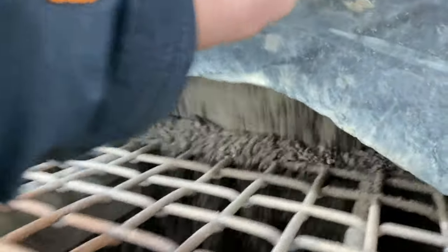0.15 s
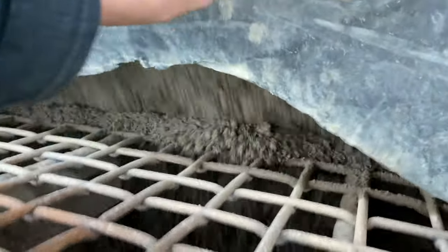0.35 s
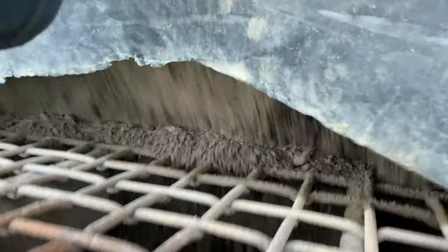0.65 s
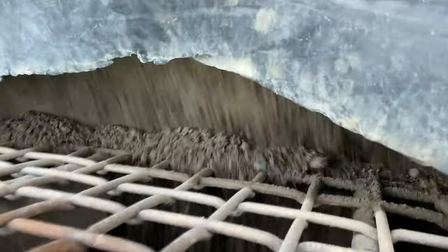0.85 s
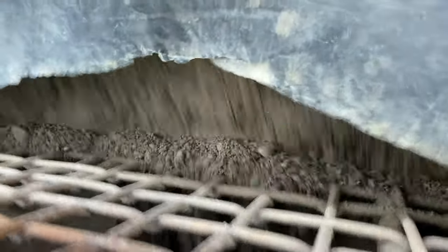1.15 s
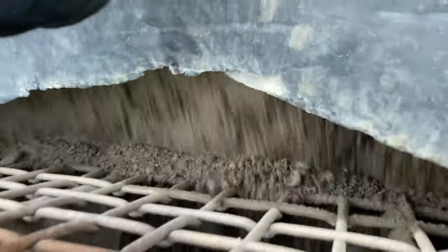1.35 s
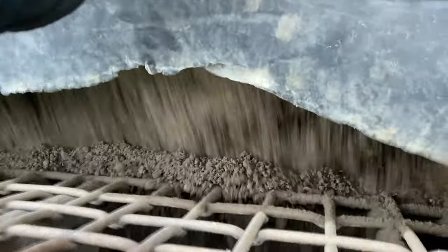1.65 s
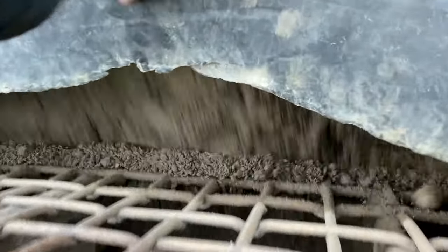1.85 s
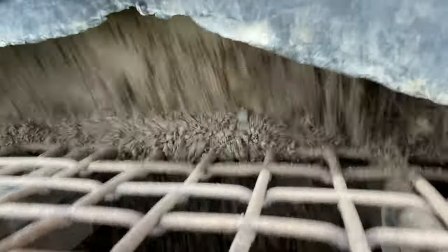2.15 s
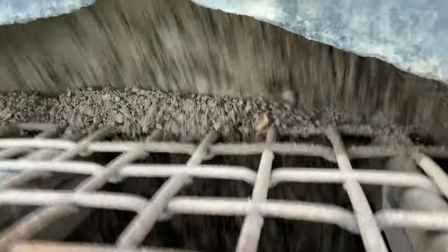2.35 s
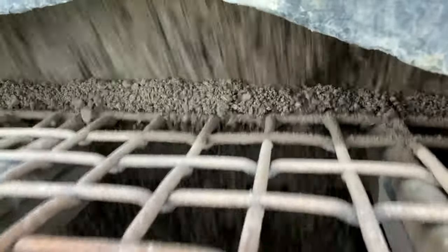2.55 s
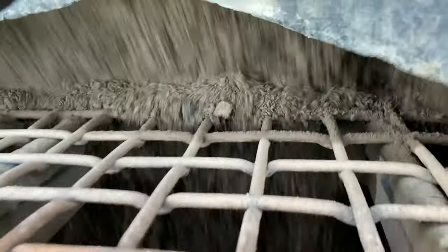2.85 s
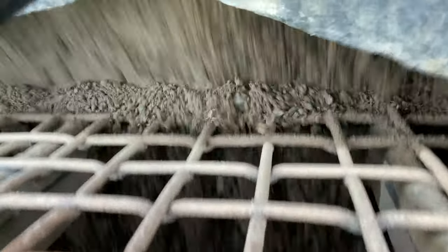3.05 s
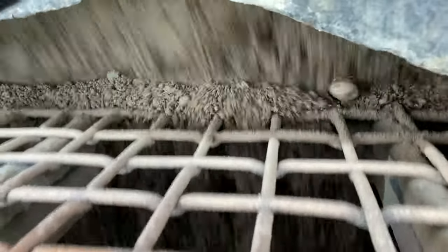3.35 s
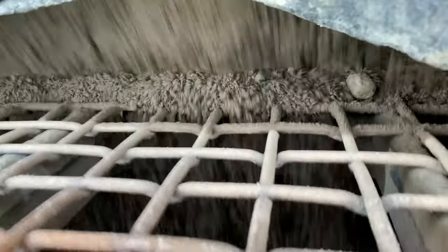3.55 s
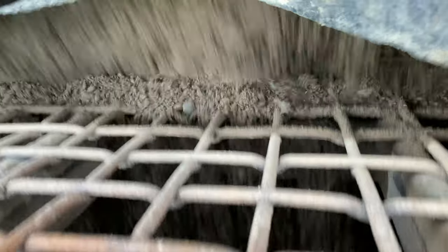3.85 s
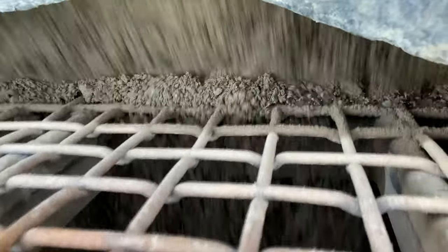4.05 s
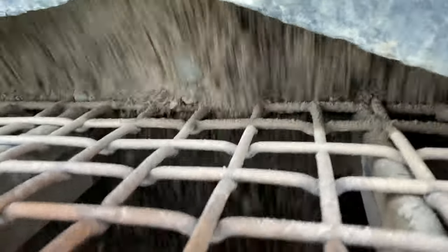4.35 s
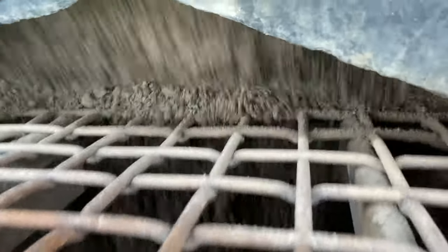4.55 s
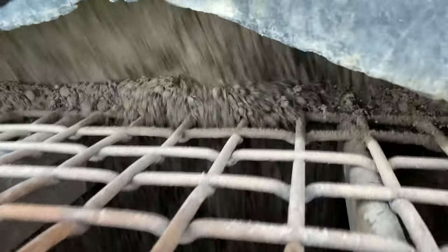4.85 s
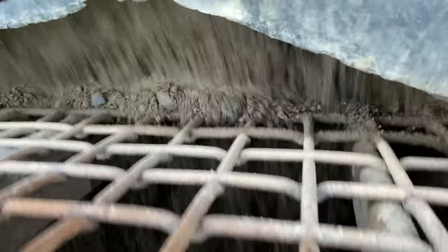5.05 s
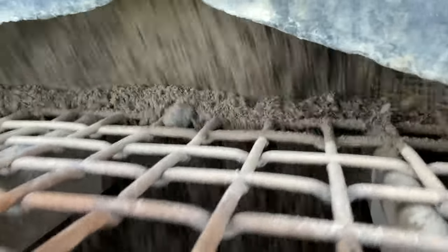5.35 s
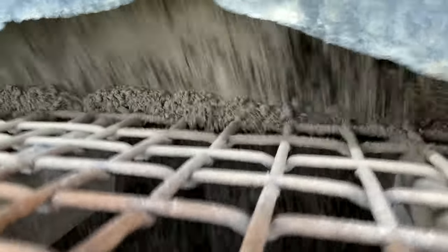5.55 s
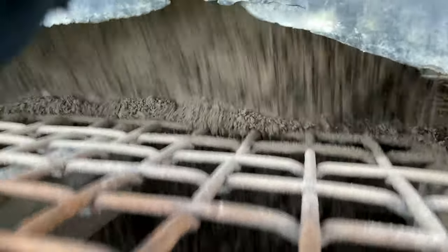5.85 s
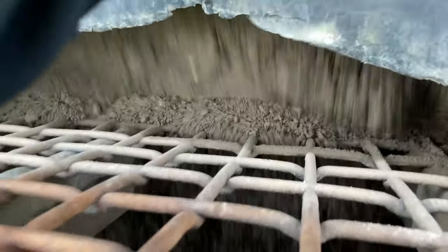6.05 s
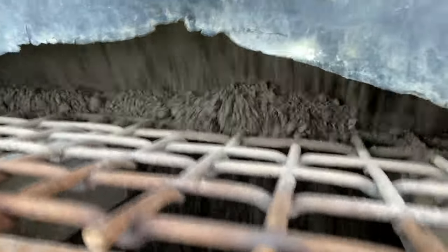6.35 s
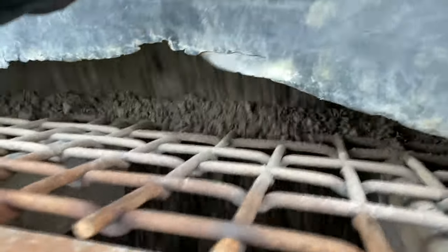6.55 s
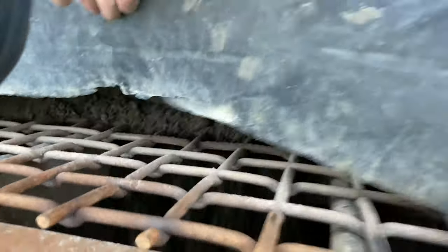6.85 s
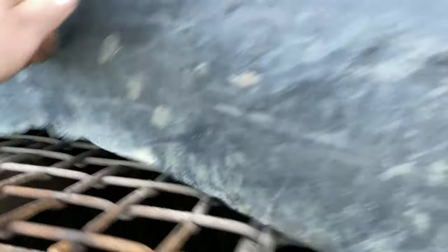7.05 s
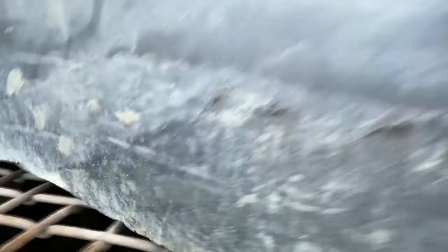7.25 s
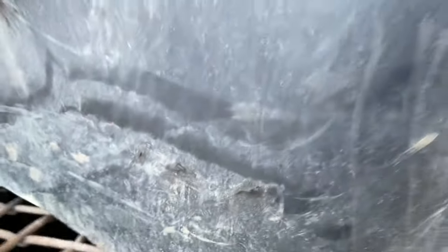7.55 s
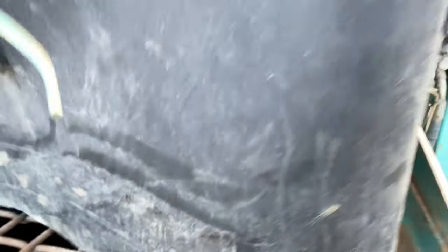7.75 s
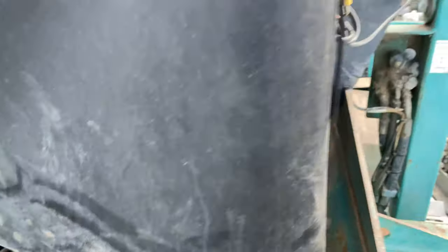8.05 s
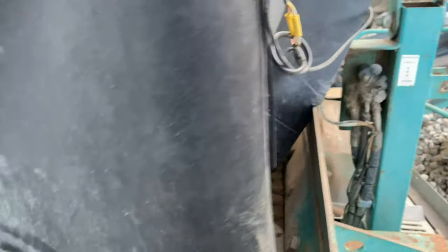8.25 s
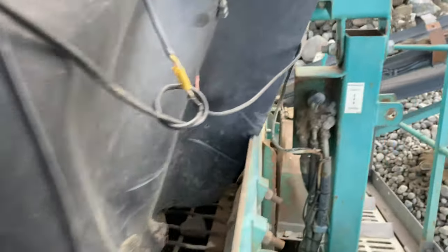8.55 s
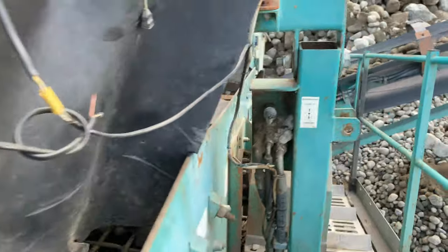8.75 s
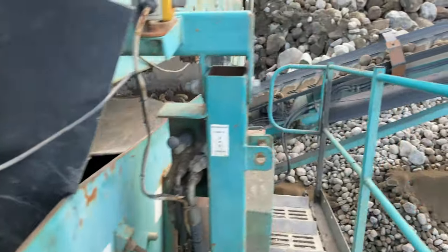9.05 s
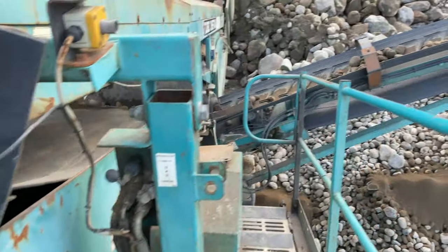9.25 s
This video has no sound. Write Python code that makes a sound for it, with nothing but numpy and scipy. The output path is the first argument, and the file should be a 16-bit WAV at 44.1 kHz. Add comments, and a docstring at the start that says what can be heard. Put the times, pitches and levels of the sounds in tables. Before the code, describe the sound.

From 0 to about 7 seconds the microphone sits very close to a vibrating screen outdoors. Sand makes a dense, grainy hiss, surging about nineteen times a second, mixed with pattering pebbles and irregular small clinks. Underneath, a hopper rumbles with short soft booms, most frequent in the first two seconds, and a diesel engine hums low and steady among wavering drones. Clumps of coarse stones rattle briefly, notably near 0.8 and 2.1 seconds. Hard stones clack and ping on the wires at about 3.6 and 4.8, the pings mainly on the left; sharp chips tick throughout. The rumble and drones slowly recede. Around 7 to 8 seconds the flap drops and the microphone pulls back, with stones clumping near 8.1. Until the cut at roughly 9.4 the gravel continues, its fine hiss duller and pulsing deeper, with coarse clatter more evident and the engine weaker.

```python
"""Gravel on a screening deck

A two-port microphone close to the vibrating steel mesh of a diesel screening plant, at a lifted rubber flap.
The deck throws its load about 19 times a second: sand hisses as dense random impulses, pebbles patter as
scraping grains in clumps, and single stones clack, knock and ping as noise bursts and damped modes.
Behind them the hopper rumbles and booms, and the engine hums in sine tones among wavering drones.
Rumble and drones recede steadily; late on the flap drops, the hiss dulls and the microphone is furthest back."""
import sys
import numpy as np
from scipy import signal
from scipy.fft import rfft, irfft, next_fast_len
from scipy.io import wavfile
from scipy.ndimage import map_coordinates

SR = 44100
rng = np.random.default_rng(int(sys.argv[2]) if len(sys.argv) > 2 else 0)


def digitize_waveform(pressure):
    """Quantize a signal to 16-bit integers and store it at the path in sys.argv[1].

    Rows of a 2-D input are taken as channels; values are limited to [-1, 1].
    """
    field = np.atleast_2d(pressure).T
    bounded = np.clip(field, -1, 1)
    quanta = np.round(bounded * 32767).astype(np.int16)
    wavfile.write(sys.argv[1], SR, quanta)


N = 414981
T = np.arange(N) / SR


def amp(db):
    """Decibels to gain."""
    return 10 ** (np.asarray(db) / 20)


def unit(x):
    """Scale to rms 1."""
    return x / np.sqrt(np.mean(x ** 2) + 1e-20)


def along(points, hz):
    """Read (frequency [Hz], value) points on a log frequency axis."""
    f, v = np.transpose(points)
    return np.interp(np.log(hz + 1), np.log(f + 1), v)


def curve(rows):
    """Draw (time [s], value) rows as one value per sample."""
    return np.interp(T, *np.transpose(rows))


def wobble(rate):
    """A smooth random curve with rate knots a second."""
    knots = rng.standard_normal(int(N * rate / SR) + 4)
    return map_coordinates(knots, [T * rate])


def filtered(x, response):
    """Multiply the spectrum of x by a complex response of frequency."""
    m = next_fast_len(N + SR // 2)
    hz = np.fft.rfftfreq(m, 1 / SR)
    return irfft(rfft(x, m) * response(hz), m)[..., :N]


def bells(peaks, hz):
    """Summed dB of bell-shaped resonances (positive) and hollows (negative)."""
    return sum(db / (1 + (2 * (hz - centre) / width) ** 2) for centre, width, db in peaks)


def colour(x, spectrum, peaks=()):
    """Give x a broad spectrum with resonances on it, at rms 1."""
    return unit(filtered(x, lambda hz: amp(along(spectrum, hz) + bells(peaks, hz))))


def impacts(rate, spread_db):
    """Two streams of random impulses, rate a second, with log-normal sizes; rms 1."""
    hit = rng.random((2, N)) < rate / SR
    size = amp(spread_db * np.clip(rng.standard_normal((2, N)), -3, 2.4))
    sign = rng.choice([-1, 1], (2, N))
    return unit(hit * size * sign)


def pebbles(rate, spread_db, t60):
    """Each pebble lands with a short scrape of noise and a faint ring at a pitch of its own."""
    t = np.arange(SR // 50) / SR
    when, pitch, size, life = rng.random((int(rate * N / SR), 4)).T[..., None]
    hz = 2000 + 11000 * pitch
    ring = .5 * np.sin(2 * np.pi * hz * t)  # the same at both ports
    scrape = rng.standard_normal((2, len(hz), len(t)))
    level_db = -spread_db * np.log(size + .02) - 60 * t / (t60 * (.5 + life))
    grains = (ring + scrape) * amp(level_db)
    index = (when * N).astype(int) + np.arange(len(t))
    return unit(np.array([np.bincount(index.ravel(), g.ravel(), N)[:N] for g in grains]))


def bursts(times, levels_db, spectrum, attack, t60):
    """Coloured noise that starts at each blow and dies quickly; attack and t60 in seconds."""
    envelope = np.zeros(N + SR)
    t = np.arange(SR // 5) / SR
    for s, db in zip(times, levels_db):
        envelope[round(s * SR):][:len(t)] += amp(db - 60 * t / t60) * (1 - np.exp(-t / attack))
    return envelope[:N] * colour(rng.standard_normal((2, N)), spectrum)


def ringing(blows, modes, attack):
    """Damped modes (multiple, dB, t60) set off by each (s, dB, pitch) blow."""
    out = np.zeros(N + SR)
    t = np.arange(SR // 5) / SR
    for s, db, pitch in blows:
        ring = 0
        for multiple, level, t60 in modes:
            tone = np.sin(2 * np.pi * (multiple * pitch * t + rng.random()))
            ring = ring + amp(level - 60 * t / t60) * tone
        out[round(s * SR):][:len(t)] += amp(db) * ring * (1 - np.exp(-t / attack))
    return out[:N]


def swells(rows, half_s, q, grain_db):
    """A short bell-shaped swell of grainy band noise centred on each (s, dB, centre Hz) row."""
    out = np.zeros((2, N + SR))
    t = np.arange(SR // 2) / SR
    hz = np.fft.rfftfreq(len(t), 1 / SR) + 1
    shape = np.exp(-((t - t.mean()) / half_s) ** 2)
    for s, db, centre in rows:
        grain_levels = grain_db * rng.standard_normal(len(t) // 50).repeat(50)  # a new level every 50 samples
        grains = rng.standard_normal((2, len(t))) * amp(grain_levels)
        resonance = 1 / (1 + 1j * q * (hz / centre - centre / hz))
        dulling = 1 / (1 + (hz / (3 * centre)) ** 2)
        band = irfft(rfft(grains) * resonance * dulling)
        out[:, round(s * SR):][:, :len(t)] += amp(db) * shape * unit(band)
    return out[:, SR // 4:][:, :N]  # puts the middle of each swell on its time


# engine firing hum: (time [s], mean level [dB])
HUM_LEVEL = [(0, -22), (5.1, -24), (5.8, -24.5), (7.4, -26), (9.4, -31)]


def engine():
    """The diesel's firing note with faint overtones, a little unsteady under load."""
    firing_hz = 73.82
    phase = 2 * np.pi * firing_hz * T + 0.04 * wobble(8.0)
    note = np.sin(phase) + amp(-18.5) * np.sin(2 * phase) + amp(-18) * np.sin(3 * phase)
    return unit(note) * amp(curve(HUM_LEVEL) + 0.29 * wobble(6.6))


FADE_DB_PER_S = 0.4561  # rumble and drones recede as the microphone moves off

# low drones of the machine: (frequency [Hz], mean peak level at the start [dB])
DRONE_TONES = [(92.4, -35), (124, -34.5), (169, -36), (203, -36.5), (224, -39.5)]


def drones():
    """Panels and drives of the machine drone, each swelling and wavering on its own."""
    swell_db, drift_rad = 2, 0.64
    tones = 0
    for hz, db in DRONE_TONES:
        level = amp(db + swell_db * wobble(3))
        tones = tones + level * np.sin(2 * np.pi * hz * T + drift_rad * wobble(1.95))
    return tones * amp(-FADE_DB_PER_S * T)


# broad colour of the hopper's rumble: (frequency [Hz], level [dB per Hz])
RUMBLE_SPECTRUM = [(25, -32), (36, -25), (52, -4.5), (90, -1), (160, -1), (230, 0), (310, -3), (400, -8.5),
                   (700, -24.5), (2000, -78)]
# resonances of the hopper's plates: (frequency [Hz], width [Hz], level [dB])
PLATE_RESONANCES = [(124, 7.4, 4), (224, 8.4, 2.5)]
# heavy clods slumping into the hopper: (time [s], level [dB], centre frequency [Hz])
CLOD_BOOMS = [(0.1, -24, 242), (0.63, -21.5, 124), (0.75, -17.5, 214), (0.82, -24, 126), (0.98, -20.5, 129),
              (1.29, -18, 215), (1.54, -22, 125), (1.72, -22, 279), (1.95, -16.5, 221), (2.5, -21, 218),
              (2.54, -29, 124), (3.23, -18.5, 216), (3.5, -22.5, 227), (5.88, -24, 123), (6.33, -23.5, 126),
              (7.43, -30, 221), (8.83, -24.5, 220), (8.94, -31, 325)]


def hopper():
    """Stones thud unevenly on the big steel plates; each heavy clod adds a short boom."""
    thuds = impacts(rate=1500, spread_db=2.5)
    level_db = -19.5 - FADE_DB_PER_S * T + 0.65 * wobble(8)
    rumble = colour(thuds, RUMBLE_SPECTRUM, PLATE_RESONANCES) * amp(level_db)
    return rumble + swells(CLOD_BOOMS, half_s=0.082, q=6.4, grain_db=-1.5)


# how far the microphone has drawn back: (time [s], distance [0-1])
MIC_RETREAT = [(0, 0.35), (6.7, 0.51), (7.3, 0.6), (8, 1)]


def throws():
    """The deck's stroke, highest as the load lands; throws vary, and the surge is deeper from further back."""
    throw_hz, landing = 18.775, .68  # landing as a share of the cycle
    fullness = 1 + .35 * wobble(9) + .35 * curve(MIC_RETREAT)
    return np.cos(2 * np.pi * (throw_hz * T - landing)) * fullness


# coarse stones at the open end of the deck: (time [s], level before the jolts [dB])
COARSE_LEVEL = [(0, -35), (8.1, -46), (8.33, -34.5), (9.4, -32)]
# colour of their rattle: (frequency [Hz], level [dB per Hz])
CLATTER_SPECTRUM = [(700, -14), (1500, 1.5), (2400, 3), (3300, -3), (5000, -8.5), (9000, -45)]


def clatter():
    """Stones too big for the mesh hop along the far end of the deck."""
    hops = pebbles(rate=450, spread_db=3.0, t60=0.071)
    jolts_db = 1.5 * throws() + .5 * wobble(14)
    return colour(hops, CLATTER_SPECTRUM) * amp(curve(COARSE_LEVEL) + jolts_db)


# clumps of coarse stones rattling down together: (time [s], level [dB], centre frequency [Hz])
STONE_CLUMPS = [(0.629, -23, 2280), (0.73, -24.5, 1900), (0.84, -20.5, 1200), (1.922, -21, 1720),
                (2.006, -22.5, 1670), (2.108, -20.5, 1700), (2.133, -16, 1360), (2.64, -23, 1200),
                (2.86, -24, 1900), (3.172, -23, 1400), (4.137, -21.5, 1200), (4.313, -23.5, 1600),
                (4.63, -22, 1200), (6.011, -23, 1890), (6.523, -23.5, 1200), (7.225, -20, 1300),
                (7.435, -24, 1480), (7.656, -22, 1110), (8.075, -18.5, 945), (8.355, -21, 1500),
                (8.4, -26, 1810), (8.584, -23, 1480), (9.11, -28, 2300), (9.385, -26.5, 2190)]


def clumps():
    """Coarse stones arrive in bunches, each a brief swell of grainy noise."""
    return swells(STONE_CLUMPS, half_s=0.019, q=1.2, grain_db=-1.5)


# the stream of gravel on the deck, also the reference for stray stones: (time [s], relative level [dB])
GRAVEL_FLOW = [(0.0, -26), (0.26, -24.5), (3.78, -27), (4.25, -26), (4.61, -26.5), (5.93, -26.5),
               (7.92, -28.5), (8.5, -26.5), (8.91, -28.5), (9.3, -27.5)]


def flow_at(s):
    """Relative level of the gravel stream in dB at the times s."""
    return np.interp(s, *np.transpose(GRAVEL_FLOW))


def stray_pebbles():
    """Rows (s, dB, pitch Hz) of single pebbles that clink on the mesh at random."""
    per_s, above_flow_db, lowest_hz, octaves = 22, 2.8, 1000, 2.3
    place, size, pitch = rng.random((int(per_s * N / SR), 3)).T
    s = place * N / SR
    level_db = flow_at(s) + above_flow_db + 3 * (size - pitch)  # high clinks are weaker
    return np.c_[s, level_db, lowest_hz * 2 ** (octaves * pitch)]


# modes of a clinking pebble: (multiple of its pitch, level [dB], t60 [s])
PEBBLE_MODES = [(1, 0, .045), (1.6, -7, .03)]


def clinks():
    """Single pebbles ring on the mesh, at both ports together but in unrelated phase."""
    landings = stray_pebbles()
    return np.array([ringing(landings, PEBBLE_MODES, attack=.002) for _ in range(2)])


def stray_chips():
    """Rows (s, dB) of small chips, one at a random moment in each stretch, levelled from the flow."""
    per_s, above_flow_db, scatter_db = 1.5, -8, 6
    place, size = rng.random((int(per_s * N / SR), 2)).T
    s = (np.arange(len(place)) + place) / per_s
    return np.c_[s, flow_at(s) + above_flow_db + scatter_db * (2 * size - 1)]


# heavy stones on the wires: (time [s], wire ring level [dB], wire pitch [Hz], knock level [dB])
HEAVY_STONES = [(0.630, -22, 3400, -23), (2.129, -26, 4300, -18), (3.601, -20, 4300, -13),
                (3.603, -13, 4300, -23), (3.608, -16, 3850, -22), (4.820, -24, 4050, -18),
                (4.836, -11, 4030, -22), (4.843, -17, 4150, -20)]
# modes of a struck wire: (multiple of its pitch, level [dB], t60 [s])
WIRE_MODES = [(.87, -11, .03), (1, 0, .036), (1.06, -11, .03), (1.38, -13, .03)]


def wires():
    """The wire that a big stone hits pings briefly, close to the left port; the right is shaded."""
    blows = [row[:3] for row in HEAVY_STONES]
    ping = ringing(blows, WIRE_MODES, attack=.001)
    right_gain = amp(-13)
    return ping * np.array([[1], [right_gain]])


# the sharpest chips flicking against steel: (time [s], level [dB])
SHARP_CHIPS = [(0.624, -29), (1.092, -27), (2.109, -22), (2.357, -23), (3.32, -29), (3.599, -18.5),
               (4.115, -26), (4.604, -28), (4.814, -25), (6.521, -24), (6.659, -28), (7.172, -32),
               (8.658, -25)]
# colours of a stone's crunch, its knock and a chip's tick: (frequency [Hz], level [dB per Hz])
CRUNCH_SPECTRUM = [(1500, -22), (3100, -12), (3600, -2), (4400, 0), (5000, -8), (5800, -9), (7000, -19),
                   (12000, -36)]
KNOCK_SPECTRUM = [(200, -12), (650, 0), (1200, 0), (2000, -1), (2900, -6), (4500, -15), (7000, -25),
                  (14000, -42)]
TICK_SPECTRUM = [(2000, -14), (6000, -4), (8200, -1), (11000, 0), (16000, -8)]
# modes of the frame under the mesh: (frequency [Hz], level [dB], t60 [s])
FRAME_MODES = [(428, 2, 0.17), (715, -5, 0.086), (1126, -15, .06), (1390, -3, 0.082), (1545, -10, .07),
               (1830, -15, 0.041)]


def stones():
    """Big stones crunch on the mesh and knock the frame into ringing; chips only tick."""
    crunch_db, frame_db = -5.5, -5  # against the wire's ring; against the knock
    s, ring_db, _, knock_db = np.transpose(HEAVY_STONES)
    crunch = bursts(s, ring_db + crunch_db, CRUNCH_SPECTRUM, attack=.001, t60=.045)
    knock = bursts(s, knock_db, KNOCK_SPECTRUM, attack=.0005, t60=.055)
    blows = np.c_[s, knock_db + frame_db, np.ones(len(s))]  # the frame keeps its pitch
    frame = np.array([ringing(blows, FRAME_MODES, attack=.0005) for _ in range(2)])
    chip_s, chip_db = np.transpose(np.vstack([SHARP_CHIPS, stray_chips()]))
    ticks = bursts(chip_s, chip_db, TICK_SPECTRUM, attack=.0007, t60=.045)
    return crunch + knock + frame + ticks


# finest spray, shut in once the flap has dropped: (time [s], treble gain [dB])
SPRAY_TREBLE = [(7.0, 0.13), (8.65, -2.5)]
# broad colour of sand on mesh: (frequency [Hz], level [dB per Hz])
SAND_SPECTRUM = [(150, -25), (350, -3.5), (600, 1), (900, 1), (1600, -1), (2300, -6.7), (3200, -9.7),
                 (4400, -12.7), (6000, -19), (7500, -23.5), (8800, -25), (10200, -23.5), (12000, -25.3),
                 (14000, -28.5), (15600, -34)]
# resonances and hollows of the screen box and its wires: (frequency [Hz], width [Hz], level [dB])
BOX_RESONANCES = [(444, 235, 5), (862, 69, 2), (1428, 58, 3.5), (5060, 240, 3.5), (5580, 210, -5.5),
                  (5960, 160, -1), (5680, 100, 8.5)]


def gravel():
    """Sand and pebbles land on the mesh in a surge at every throw of the deck."""
    surge = throws()
    sand = impacts(rate=12000, spread_db=2.5)
    patter = pebbles(rate=450, spread_db=2.8, t60=.018)
    stream = colour(sand + amp(-3.5) * patter, SAND_SPECTRUM, BOX_RESONANCES)
    # fine grains, the treble, swell and sink more deeply than coarse ones, and the flap shuts them in
    fine = filtered(stream, lambda hz: 1 / (1 + (3300 / (hz + 1)) ** 4))
    coarse = stream - fine
    coarse_swing_db = .9 * surge + .45 * wobble(20)
    fine_swing_db = 1.25 * surge + .95 * wobble(14)
    uneven_db = .4 * wobble(12) + .35 * wobble(30)
    grains = coarse * amp(coarse_swing_db) + fine * amp(fine_swing_db + curve(SPRAY_TREBLE))
    return grains * amp(curve(GRAVEL_FLOW) + 5.5 + uneven_db)  # 5.5 dB lifts the stream over the flow


def walls(x, share, count):
    """Faint early echoes from the steel sides put a fine ripple on the upper spectrum."""
    delays = rng.uniform(.002, .025, (2, count))  # seconds
    signs = rng.choice([-1, 1], (2, count))
    echoes = np.zeros((2, SR // 32))
    np.put_along_axis(echoes, (delays * SR).astype(int), signs / np.sqrt(count), axis=1)
    bright = filtered(x, lambda hz: hz / (hz + 900))
    return x + share * signal.fftconvolve(bright, echoes, axes=1)[:, :N]


# resonances and hollows that shift as the microphone moves past curtain and frame:
# (width [Hz], rows of (time [s], mean centre [Hz], mean level [dB]))
SHIFTING_RESONANCES = [(70, [(7.7, 230, 0), (8.2, 215, -3.5), (8.8, 170, -2), (9.4, 135, -2)]),
                       (100, [(2, 430, 0), (4.8, 390, 2), (8.3, 330, 0), (8.85, 330, 4), (9.4, 340, 0.5)]),
                       (100, [(7.2, 475, 0), (8.3, 470, -4.5), (9.4, 450, -6.5)]), (170, [(2.5, 880, 1),
                       (4.3, 830, 2), (5.8, 950, 2), (6.8, 950, 1.5), (7.3, 910, 4), (8.3, 900, 3),
                       (9.4, 850, -1.5)]), (220, [(7.4, 1250, 1.5), (7.9, 1230, -4), (8.5, 1210, -12),
                       (8.8, 1300, -1.5), (9.4, 1550, -4)])]


def shifting(x):
    """Colour x with the resonances and hollows that move with the microphone."""
    hz, s, z = signal.stft(x, SR, nperseg=2048)
    peaks = []
    for width, rows in SHIFTING_RESONANCES:
        when, centre, db = np.transpose(rows)
        waver = 1 + 0.045 * np.interp(s, T, wobble(4.6))
        flutter_db = 0.94 * np.interp(s, T, wobble(7))
        peaks.append((np.interp(s, when, centre) * waver, width, np.interp(s, when, db) + flutter_db))
    return signal.istft(z * amp(bells(peaks, hz[:, None])), SR)[1][:, :N]


def ports(pair, table):
    """Mix two unrelated signals into left and right; left leads, except in the high treble."""
    f, alike, balance_db, turn = np.transpose(table)

    def angle(hz):
        """Half the angle whose cosine is the coherence."""
        return np.arccos(np.clip(along(np.c_[f, alike], hz), 0, 1)) / 2

    def shade(hz):
        """Complex gains of both ports: level balance, travel time and extra phase."""
        travel = np.where(hz < 6280, 20, -8.1) / SR  # seconds by which left leads
        phase = np.pi * hz * travel + along(np.c_[f, turn], hz) / 2
        half = amp(along(np.c_[f, balance_db], hz) / 2) * np.exp(1j * phase)
        gains = np.array([half, 1 / half])
        return gains / np.sqrt(np.mean(abs(gains) ** 2, axis=0))

    common, apart = filtered(pair, lambda hz: np.array([np.cos(angle(hz)), np.sin(angle(hz))]))
    return filtered(np.array([common + apart, common - apart]), shade)


# the two ports close to the deck, then further back outside the flap:
# (frequency [Hz], coherence [0-1], left minus right [dB], phase beyond the travel time [rad])
PORTS_AT_DECK = [(60, 0.75, 2, 0.51), (277, 0.97, -2, -0.96), (365, 0.44, 2, 1.45), (500, 0.65, 5.5, 1.2),
                 (684, 0.53, 8, 1.05), (1010, 0.5, 3, 0.43), (1610, 0.93, 2.5, -1.02),
                 (2120, 0.39, -1, -1.72), (4230, 0.14, 5.5, 0.16), (6120, 0.2, 9, 0.58), (7000, 0.3, 5, 0),
                 (7540, 1, 1, 0.27), (12300, 1, 0, -0.092)]
PORTS_OUTSIDE = [(60, 1, 6.5, 0.31), (303, 0.86, -1, -0.15), (428, 0.49, -0.5, 1.27), (625, 1, 9, 1.9),
                 (910, 0.43, 13.5, 0.23), (1270, 1, 1.5, 0.43), (2080, 0.68, 2.5, -1),
                 (3030, 0.3, 1, -0.53), (5930, 0.26, 9.5, 0.98), (7000, 0.45, 8, 0.3), (7500, 1, 1.5, 0.48),
                 (11900, 1, -0.5, -0.27)]
# small ringing hollow formed by a sleeve beside the right port: (time [s], share)
SLEEVE_SHARE = [(0, 0.84), (.4, 1), (.8, 0.76), (1.4, 0.26)]


def scene():
    """Deck and hopper reach two ports that draw back; a sleeve colours the right, most at first."""
    on_mesh = gravel() + clatter() + clumps() + clinks()
    deck = walls(on_mesh, share=.22, count=24)
    plant = shifting(deck + stones() + hopper())
    back = np.clip(curve(MIC_RETREAT), 0, 1)
    left, right = (1 - back) * ports(plant, PORTS_AT_DECK) + back * ports(plant, PORTS_OUTSIDE)
    hollow = filtered(right, lambda hz: 1 / (1 + 2j * (hz - 950) / 160))  # 950 Hz, 160 Hz wide
    heard = np.array([left, right + curve(SLEEVE_SHARE) * hollow])
    return heard + wires() + engine() + drones()


def record(dry):
    """The recorder keeps nothing from its band limit of 15.6 kHz upwards."""
    return filtered(dry, lambda hz: hz < 15600)


dry = scene()
out = record(dry)
digitize_waveform(out)
```